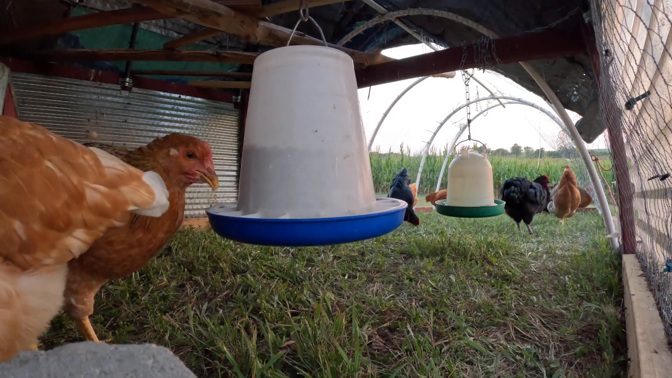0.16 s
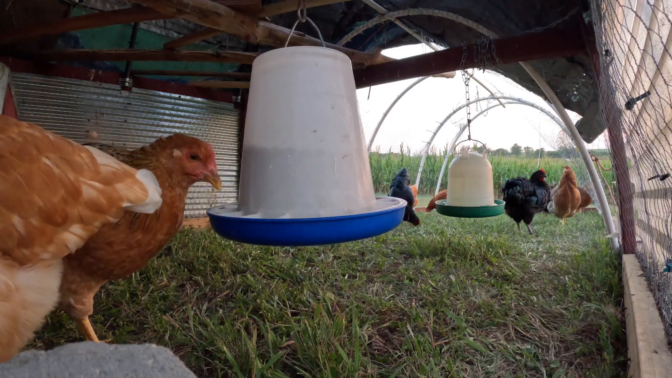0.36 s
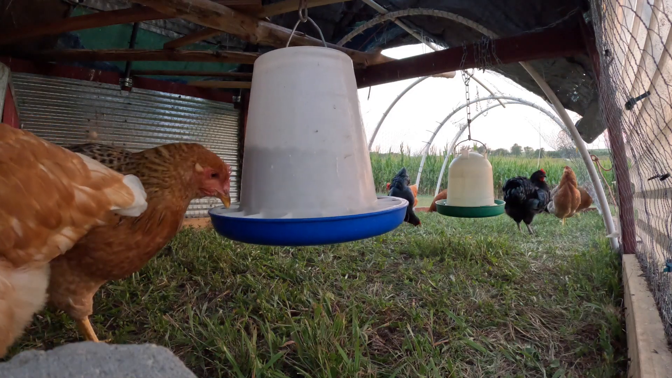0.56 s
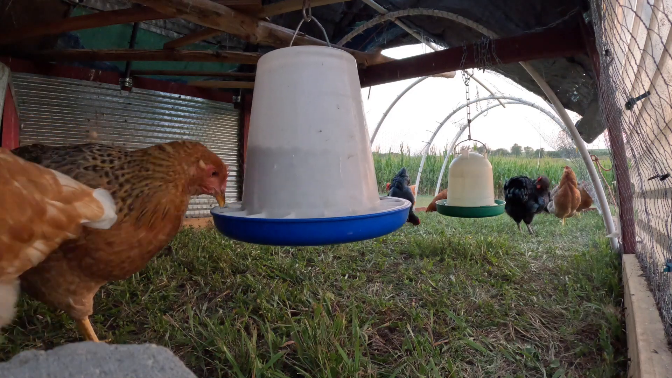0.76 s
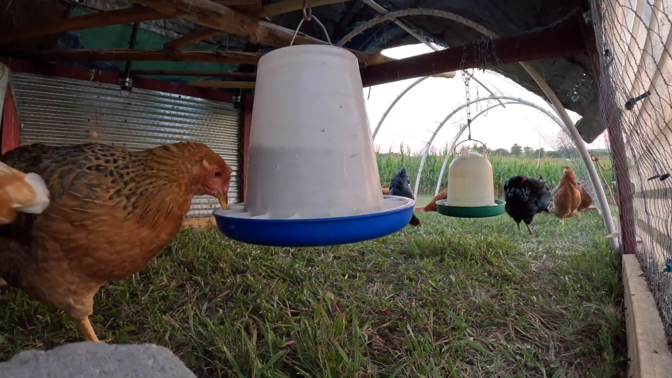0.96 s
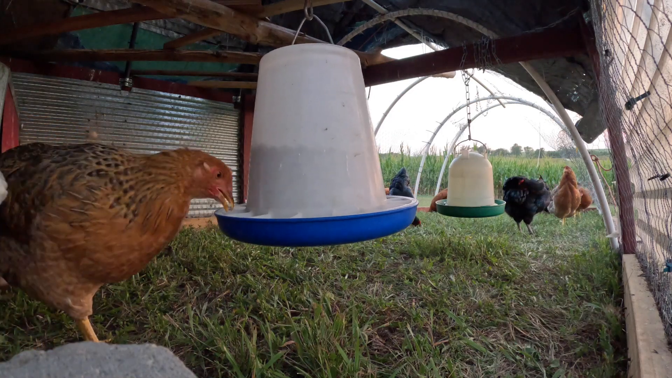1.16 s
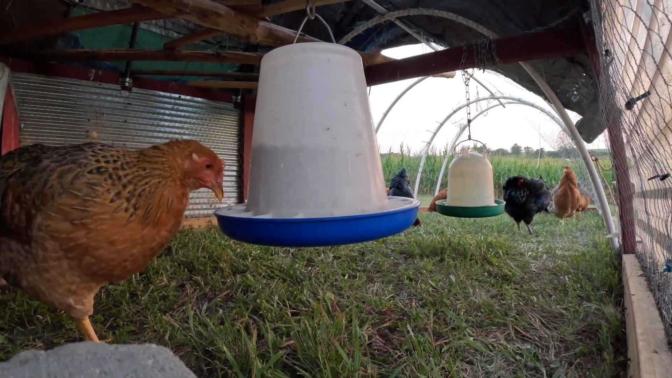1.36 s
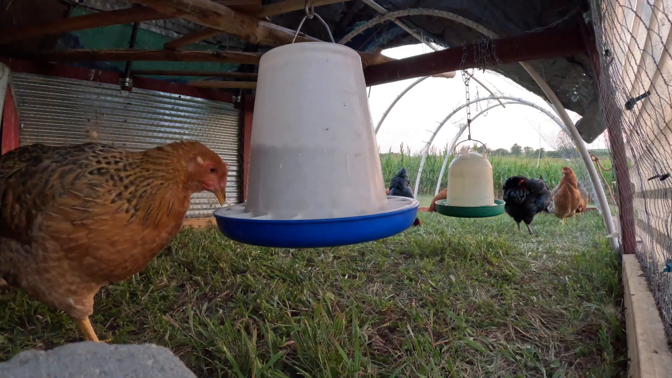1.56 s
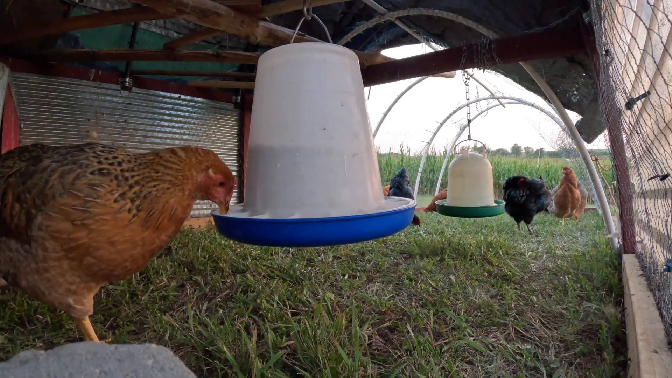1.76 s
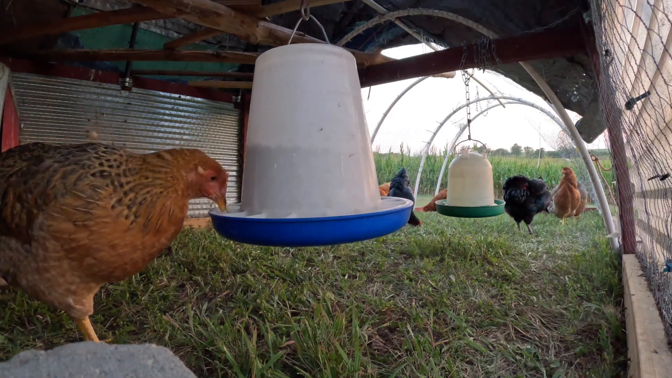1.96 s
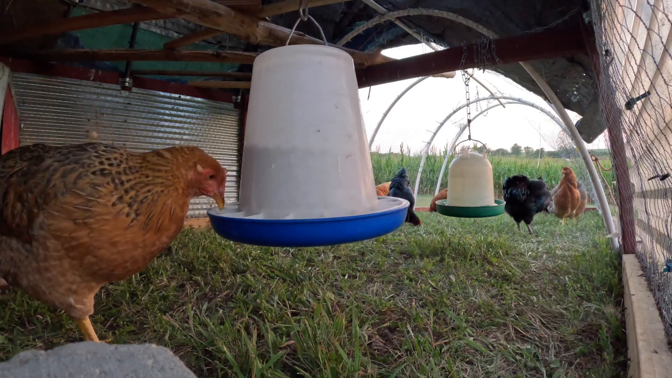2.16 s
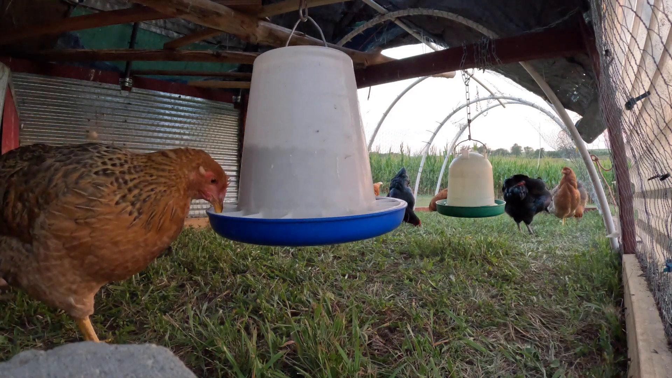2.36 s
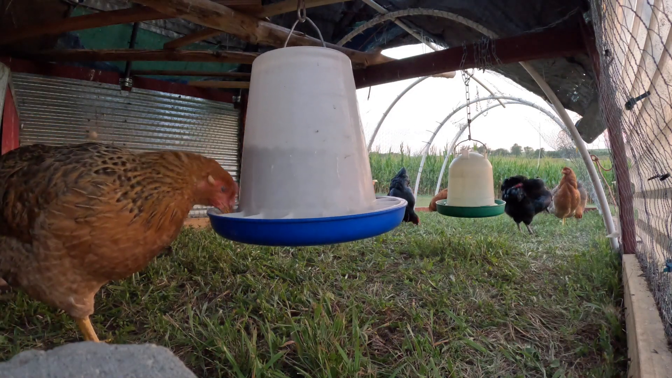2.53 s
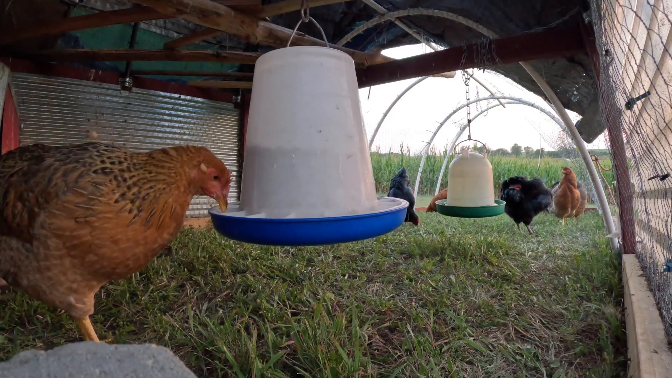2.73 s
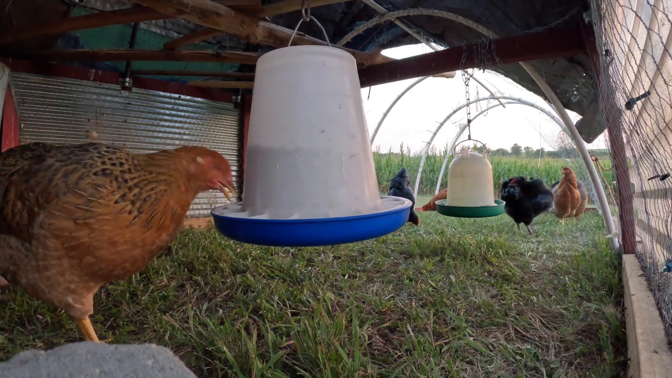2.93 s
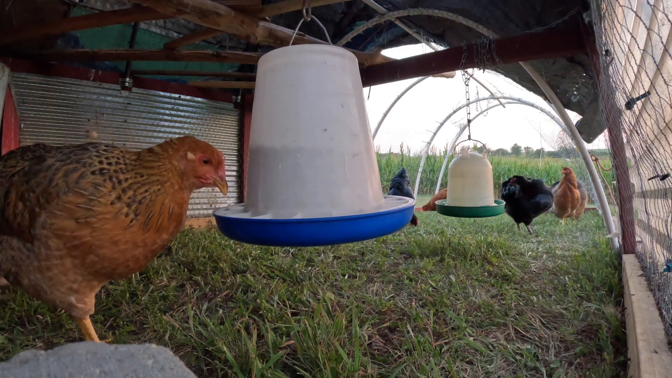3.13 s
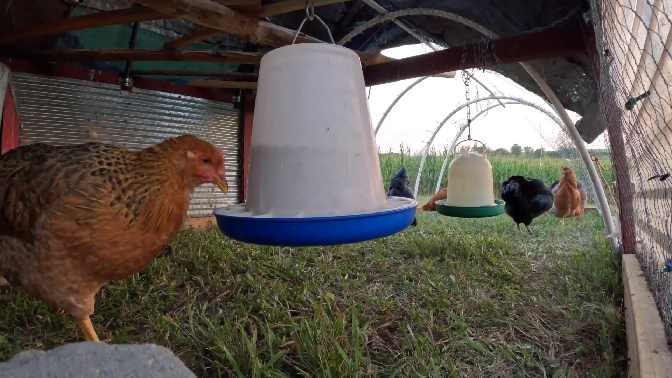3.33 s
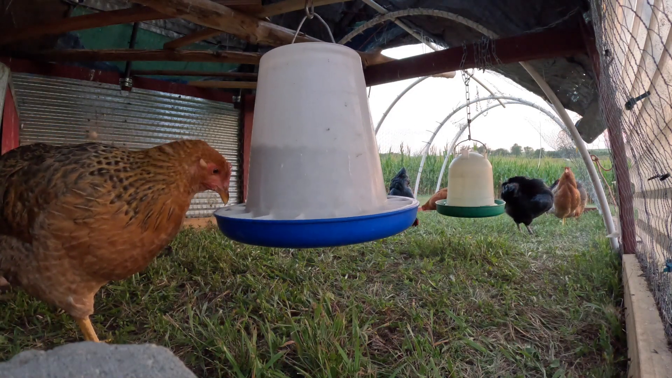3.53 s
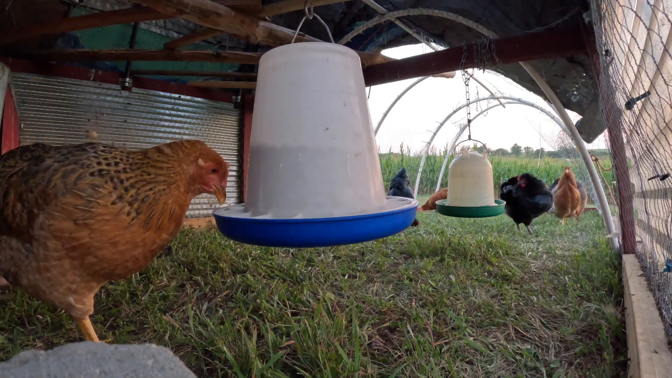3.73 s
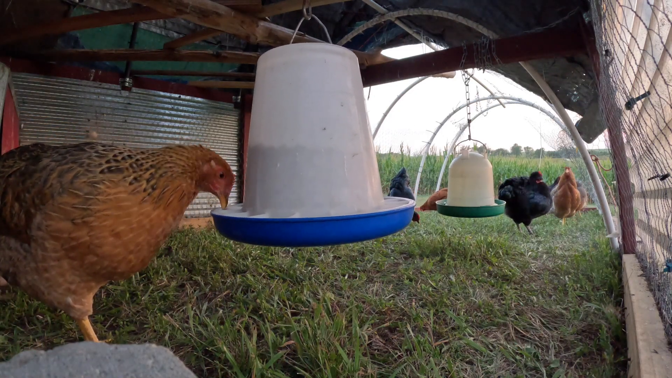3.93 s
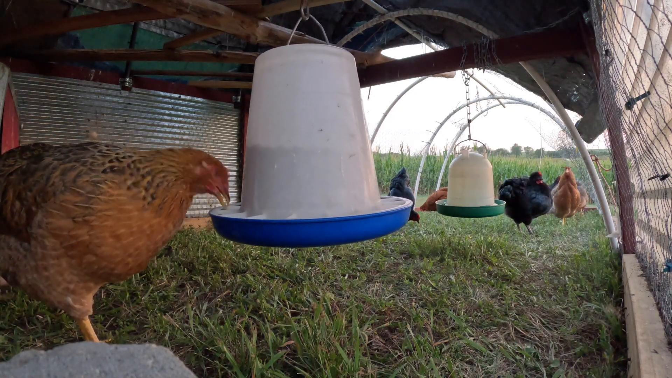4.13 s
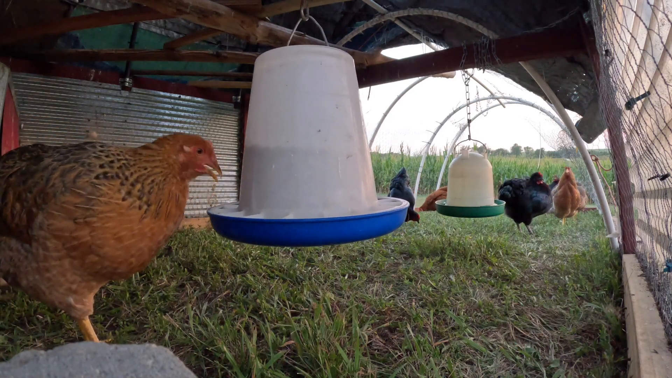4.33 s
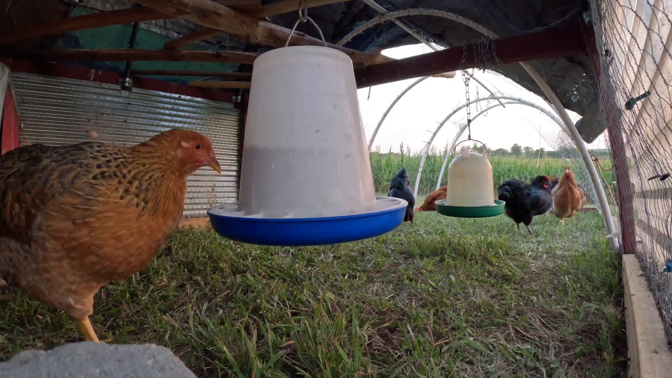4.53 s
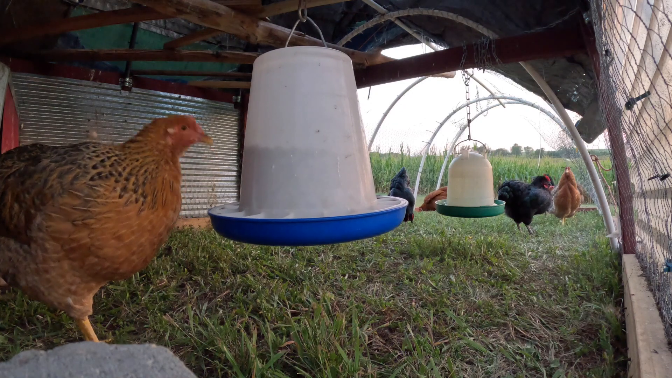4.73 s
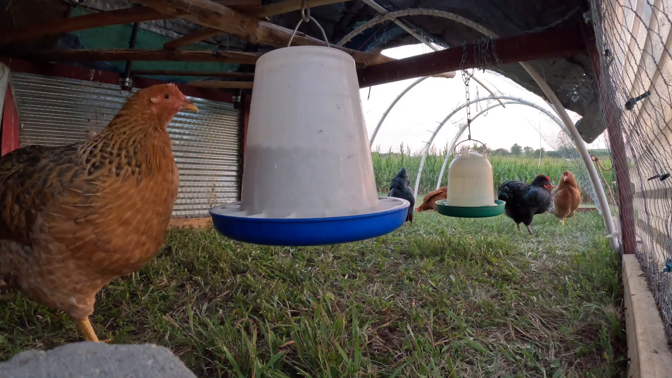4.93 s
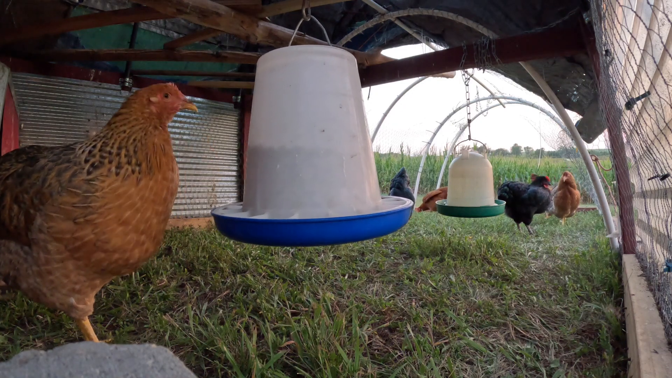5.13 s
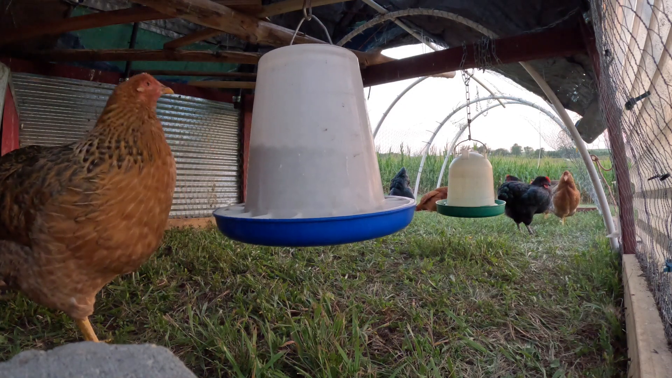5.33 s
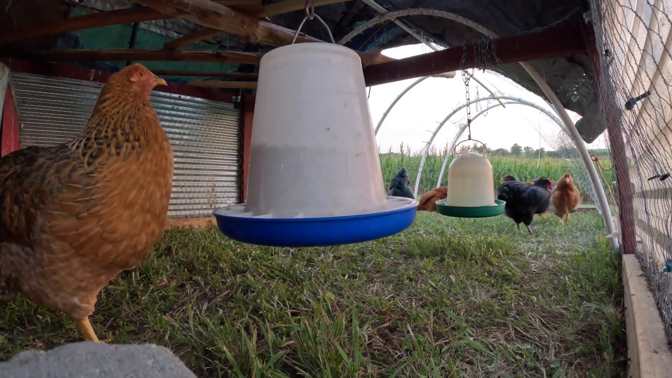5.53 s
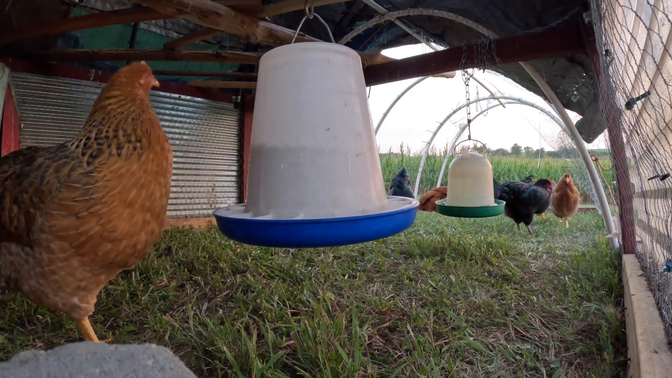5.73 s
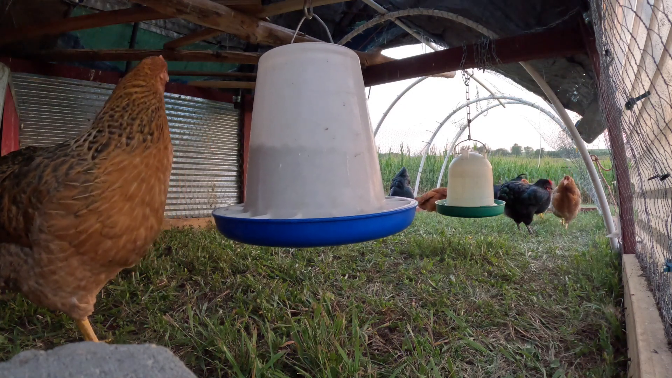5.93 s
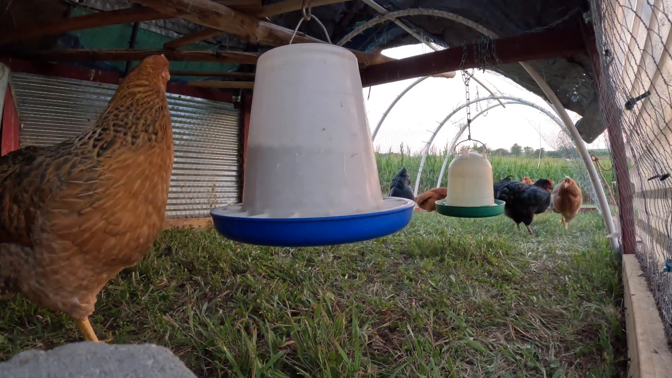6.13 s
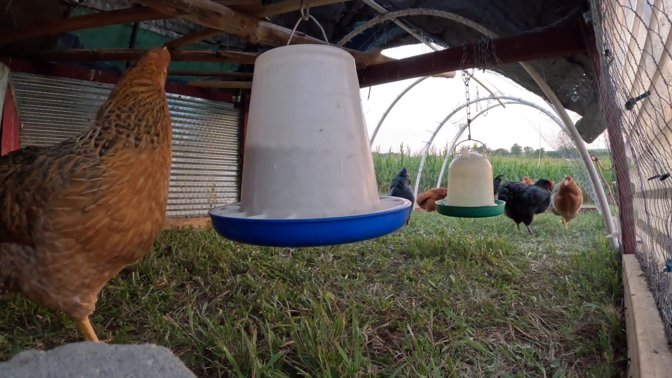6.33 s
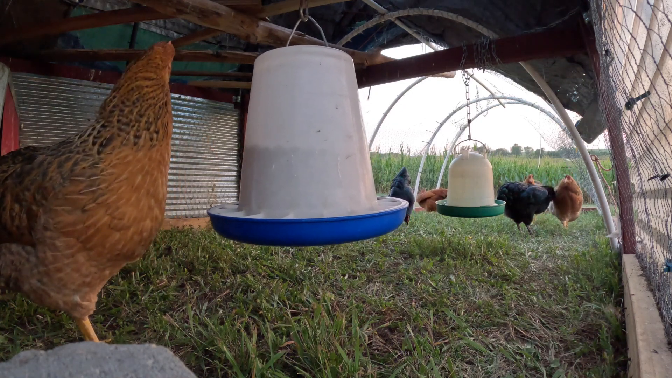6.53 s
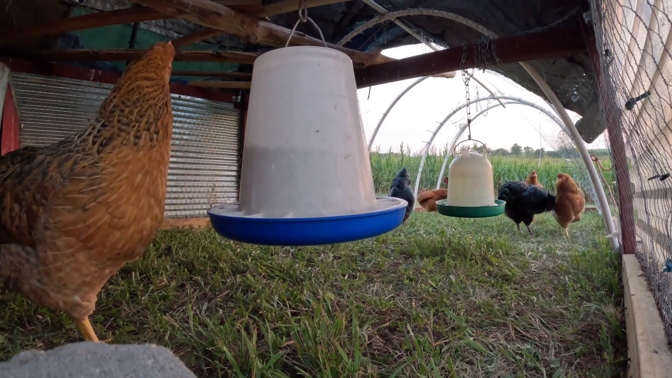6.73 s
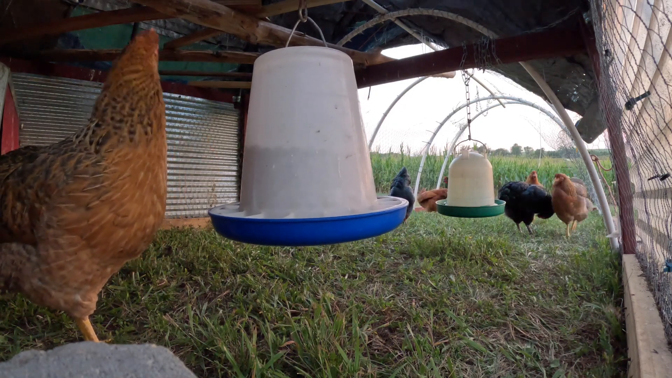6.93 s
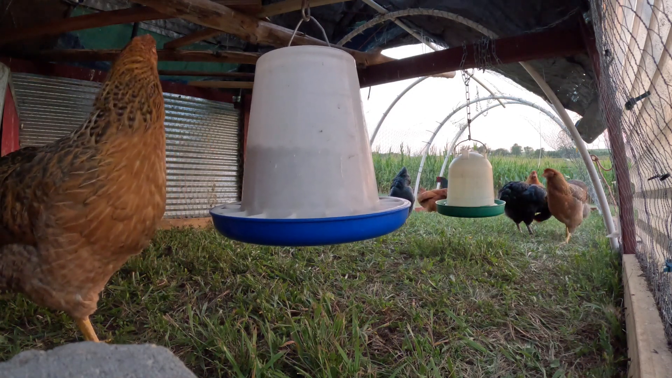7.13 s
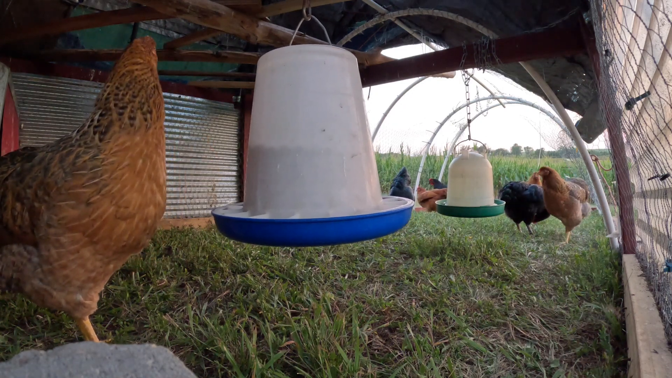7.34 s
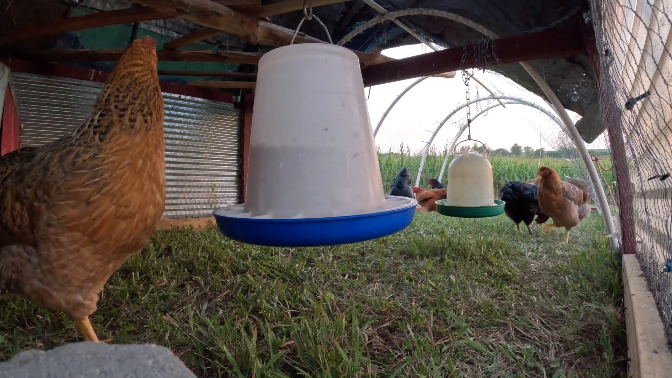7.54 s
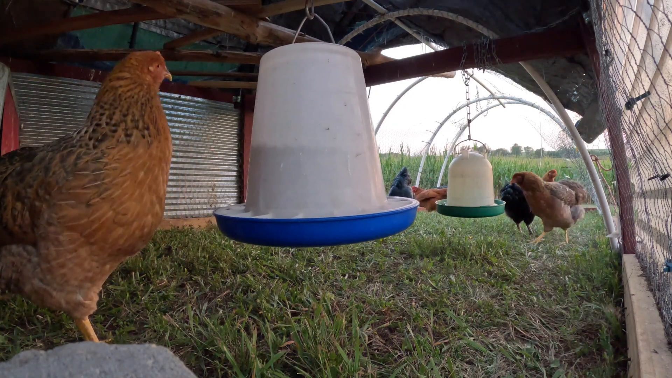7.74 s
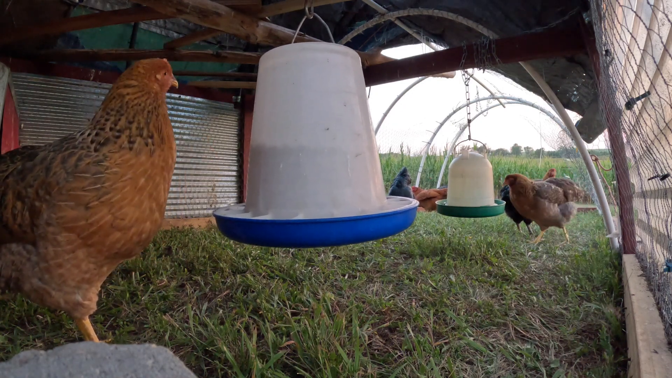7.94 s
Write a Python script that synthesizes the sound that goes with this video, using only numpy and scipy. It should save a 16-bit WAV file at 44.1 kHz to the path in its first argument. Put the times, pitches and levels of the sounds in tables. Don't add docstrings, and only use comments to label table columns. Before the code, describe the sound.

Close up in an outdoor run, a hen pecks a hanging plastic tray in short clusters: hard bright cracks, brief hollow ringing and crunching grain. The pecking thins and stops after about four seconds. Quiet insect chirring continues, then feathers rustle and hens give soft low clucks, dull bumps, a rough croak and thin squeals. Wide stereo microphone near the feeder, faint breeze and distant flock murmur.

```python
import sys
import numpy as np
from scipy import signal
from scipy.fft import rfft, irfft, next_fast_len
from scipy.io import wavfile
from scipy.ndimage import uniform_filter1d

SR = 44100
rng = np.random.default_rng(int(sys.argv[2]) if len(sys.argv) > 2 else 0)


def convert_level_to_amplitude(level_db):
    exponent = np.asarray(level_db, float) / 20
    return 10 ** exponent


def transcribe(signal):
    frames = np.atleast_2d(signal).T
    limited = np.clip(frames, -1, 1)
    pcm = np.round(limited * 32767).astype(np.int16)
    wavfile.write(sys.argv[1], SR, pcm)


N = 352359
PADDED = next_fast_len(N)


def evened(x):
    return x / np.sqrt(np.mean(x ** 2) + 1e-20)


def read(points, hz):
    f, value = np.transpose(points)
    return np.interp(np.log(hz + 1), np.log(f + 1), value)


def add(mix, s, sound):
    part = mix[round(s * SR):][:len(sound)]
    part += sound[:len(part)]


def columns(rows):
    s, *values = np.transpose(rows)
    t = np.arange(s[0], s[-1], 1 / SR)
    return [np.interp(t, s, v) for v in values]


def hump(start, swell, dying, from_db, top_db, to_db):
    top = start + swell
    return [(start, top_db + from_db), (top, top_db), (top + dying, top_db + to_db)]


def level(humps):
    out = np.zeros(N)
    for rows in humps:
        db, = columns(rows)
        add(out, rows[0][0], convert_level_to_amplitude(db) * signal.windows.tukey(len(db), .06))
    return out


def within(points, hz):
    return (hz > points[0][0]) & (hz < points[-1][0])


def coloured(x, points):
    hz = np.fft.rfftfreq(PADDED, 1 / SR)
    return evened(irfft(rfft(x, PADDED) * convert_level_to_amplitude(read(points, hz)) * within(points, hz), PADDED)[:N])


def wander(frames, top_hz):
    t = np.arange(frames) * 256 / SR
    rates = np.geomspace(top_hz / 12, top_hz, num=24)
    return evened(sum(np.sin(2 * np.pi * (f * t + rng.random())) / np.sqrt(f) for f in rates))


def resonate(x, hz, width_hz):
    return signal.lfilter(*signal.iirpeak(hz, hz / width_hz, SR), x)


# (frequency [Hz], level [dB])
WIND = [(15, -0.5), (45, 1.5), (75, -13.5), (110, -27.5)]
# (frequency [Hz], level [dB])
AIR = [(15, -14.5), (45, -15.5), (95, -32), (300, -19), (2400, -31.5), (11000, -47.5), (12600, -46.5),
       (15100, -56.5)]
# (frequency [Hz], level [dB])
MURMUR = [(100, -31), (140, -14), (185, 3), (230, -7.5), (290, -13.5), (420, -21.5), (500, -40.5)]
# (frequency [Hz], level [dB])
ROAD = [(800, -36), (1000, 1.5), (1100, 2), (1400, 0.5), (1900, -8.5), (2400, -25.5)]
# (frequency [Hz], level [dB])
CHORUS = [(2700, -22), (3500, -11.5), (4300, -7.5), (4750, -4.5), (5100, -6.5), (5400, -8), (6000, -11.5),
          (6500, -18.5)]
# (frequency [Hz], level [dB])
KATYDIDS = [(3710, -42), (6300, -14), (7170, -4), (7380, -2.5), (7740, -1.5), (8350, -16), (8500, -13.5),
            (11000, -38)]
# (time [s], carry [dB])
BREEZE = [(0, 10.5), (0.24, 2), (0.58, -10.5), (1.2, 0.5), (1.51, -3), (2.0, 3), (2.62, -3.5), (3.89, -1),
          (4.18, 4), (4.61, 1.5), (4.87, 2.5), (5.47, 1), (6.34, 9), (6.7, 3), (7.99, 1)]
# (time [s], level [dB])
CHORUS_FADE = [(0, -59.5), (2.619, -59.5), (4.3, -64.5), (5.47, -62.5), (7.99, -66)]
# (frequency [Hz], likeness [0-1])
LIKENESS = [(20, .86), (140, .68), (770, .3), (2700, .35), (4200, .62), (6400, .72), (9800, .8),
            (15000, .2)]
# (frequency [Hz], left minus right [dB])
LEAN = [(60, -2.5), (140, -2.5), (500, -10), (1200, -2.5), (2700, .5), (10000, 1.5), (12000, 23),
        (15000, 27.5)]


def background():
    frames, hz = N // 256 + 5, np.fft.rfftfreq(1024, 1 / SR)
    t = np.arange(frames) * 256 / SR
    carry_db = np.interp(t, *np.transpose(BREEZE))
    chorus_db = np.interp(t, *np.transpose(CHORUS_FADE))
    murmur_db = -63 + 0.27 * carry_db + .5 * t
    beat = np.sin(2 * np.pi * np.cumsum(16 + 2.2 * wander(frames, 3)) * 256 / SR)
    layers = [(WIND, -67.5 + 3 * wander(frames, 5.5)),
              (AIR, -66.5 + 0.48 * wander(frames, 4.2)),
              (MURMUR, murmur_db + 1.9 * wander(frames, 25)),
              (ROAD, -70 + carry_db + 0.408 * wander(frames, 1.8)),
              (CHORUS, chorus_db + 1.0 * wander(frames, 30)),
              (KATYDIDS, -65 + 2.0 * beat + 0.65 * wander(frames, 15))]
    power = 0
    for points, db in layers:
        shape = convert_level_to_amplitude(read(points, hz)) * within(points, hz)
        power = power + (shape[:, None] / np.linalg.norm(shape) * convert_level_to_amplitude(db)) ** 2
    top_band = (hz > 8300) & (hz < 11300)
    lull_db = 2.5 * np.outer(top_band, wander(frames, 12))
    power = power * convert_level_to_amplitude(2 * lull_db)

    a, b, c, d, patches = rng.standard_normal((frames, 513, 5)).T
    patches = uniform_filter1d(uniform_filter1d(patches, size=5, axis=0), size=10, axis=1)
    same = np.clip(read(LIKENESS, hz), 0, 1)[:, None]
    lean = convert_level_to_amplitude(read(LEAN, hz) / 2)[:, None]
    left = a + 1j * b
    right = same * left + np.sqrt(1 - same ** 2) * (c + 1j * d)
    field = np.array([left * lean, right / lean]) * np.sqrt(power) * convert_level_to_amplitude(0.93 * evened(patches))
    return 0.61 * signal.istft(field, nperseg=1024, noverlap=768)[1][:, :N]


# (frequency [Hz], level [dB], pulse rate [1/s])
SINGERS = [(4720, -72, 16), (4780, -78, 17), (4850, -77.5, 38), (5100, -73.5, 23), (4970, -83.5, 50),
           (5450, -79.5, 30), (7100, -87.5, 47.2), (7400, -80.5, 6.3), (7520, -77.5, 34), (7960, -77.5, 18)]
# (frequency [Hz], level at the start [dB], pulse rate [1/s])
SWARM = [(5520, -75, 21), (5700, -76, 29), (5790, -77, 17), (5840, -76, 35), (6110, -77.5, 25)]


def singers():
    out, frames = np.zeros((2, N)), N // 256 + 2
    fades = [0] * len(SINGERS) + [2.5] * len(SWARM)
    sides = rng.uniform(-2.2, 2, len(fades))
    for (hz, db, per_s), fade, side in zip(SINGERS + SWARM, fades, sides):
        waver, pace, swell = (np.repeat(wander(frames, top), 256)[:N] for top in (40, 4, 14))
        beat = np.sin(2 * np.pi * np.cumsum(per_s * (1 + .45 * pace)) / SR)
        pulses = np.clip(.5 + .7 * beat, 0, 1)
        tone = np.sin(2 * np.pi * np.cumsum(hz * (1 + .004 * waver)) / SR)
        course_db = db - fade * np.arange(N) / SR + 2.78 * uniform_filter1d(swell, size=256)
        out += convert_level_to_amplitude(course_db + np.array([[side], [-side]])) * pulses * tone
    return out


# (start [s], end [s], frequency [Hz], level [dB])
TRILLS = [
    (.15, 0.33, 4050, -74),
    (1.46, 1.69, 4070, -67.5),
    (4.256, 4.404, 4090, -69.5),
]


def cricket():
    out = np.zeros(N)
    for start, end, hz, db in TRILLS:
        t = np.arange(0, end - start, 1 / SR)
        noises = rng.standard_normal((2, len(t)))
        waver, swell = (evened(np.convolve(v, np.hanning(900), "same")) for v in noises)
        line = np.sin(2 * np.pi * hz * t + .8 * waver)
        add(out, start, convert_level_to_amplitude(db - 2 + 2.5 * swell) * line * signal.windows.tukey(len(t), .5))
    return out


# (loudest moment [s], swell [s], dying [s], top level [dB])
RUSTLES = [(.45, 0.12, 0.093, -88.5), (.866, 0.071, 0.074, -83.5), (1.85, 0.13, 0.17, -85.5),
           (5.386, 0.033, .05, -88), (5.712, 0.075, 0.043, -74.5), (6.238, 0.036, 0.013, -84),
           (6.57, 0.023, 0.037, -87), (6.664, 0.009, 0.021, -75.5), (6.81, 0.055, 0.043, -82.5),
           (7.11, 0.016, 0.039, -82)]
# (frequency [Hz], level [dB])
RUSTLE = [(470, 0), (800, -9), (1400, 0), (2270, -11.5), (3090, -4), (3680, -9), (4650, -5.5), (7550, 1.5),
          (15500, -27)]


def rustle():
    gain = level([hump(s - a, a, b, -12.5, db, -12.5) for s, a, b, db in RUSTLES])
    return convert_level_to_amplitude(15.0) * gain * coloured(rng.standard_normal(N), RUSTLE)


def knocks(rows):
    out, t = np.zeros(N), np.arange(-200, 200) / SR
    for s, db, hz, half in rows:
        add(out, s + t[0], -convert_level_to_amplitude(db) * np.cos(2 * np.pi * hz * t) * np.exp(-.5 * (t / half) ** 2))
    return out


# (time [s], peak [dB], frequency [Hz], half length [s])
FAR_KNOCKS = [(3.1305, -60, 1390, .0012), (4.3545, -42.5, 1600, 0.00052), (6.9553, -38, 1286, 0.00025),
              (6.9592, -47, 1190, .0007), (7.051, -51.5, 1400, .0004), (7.2068, -37, 948, 0.0003),
              (7.2108, -44.5, 1100, 0.0009), (7.2137, -55, 1100, 0.00062), (7.4226, -36, 1070, 0.00044),
              (7.433, -50, 1195, 0.00089)]


def far_knocks():
    return knocks(FAR_KNOCKS)


# (time [s], peak [dB], frequency
# [Hz], width [Hz], length [s])
BURSTS = [(0.114, -43.5, 744, 301, 0.032), (2.918, -55.5, 642, 302, 0.034), (1.141, -56, 650, 300, 0.022),
          (6.513, -64, 2570, 1200, 0.03), (2.593, -52, 690, 297, .04), (4.862, -54, 190.7, 59.5, 0.14),
          (6.513, -53, 720, 59.5, 0.041), (6.514, -58, 1443, 2420, 0.11), (6.894, -56.5, 720, 60, 0.06),
          (6.902, -61.5, 1490, 1600, 0.034), (6.955, -48.5, 1200, 506, 0.027),
          (7.211, -47.5, 990, 900, 0.02), (7.423, -50, 1102, 914, 0.026), (7.492, -55, 297, 200, 0.014),
          (7.71, -58.5, 271, 119, 0.083)]


def bursts():
    out = np.zeros(N)
    for s, db, hz, width_hz, length in BURSTS:
        t = np.arange(0, length, 1 / SR)
        r = np.exp(-np.pi * width_hz / SR)
        noise = rng.standard_normal((2, len(t) + 800))
        slow = signal.lfilter([1], np.poly([r, r, r]), noise)[:, 800:]
        note = slow[0] * np.cos(2 * np.pi * hz * t) + slow[1] * np.sin(2 * np.pi * hz * t)
        fade = (1 - np.exp(-20 * t / length)) * (1 - t / length)
        add(out, s, convert_level_to_amplitude(db - 14 * t / length) * evened(note) * fade)
    return out


# (frequency [Hz], width [Hz], level [dB])
THROAT = [(560, 260, -11), (960, 620, 5), (1430, 750, -1), (2050, 320, -2.5), (3400, 970, -10)]


def voice(rows, rough, throat_db, chest_db):
    db, hz, loss_db = columns(rows)
    jitter, breath = rng.standard_normal((2, len(hz)))
    unsteady = 0.064 * rough * evened(uniform_filter1d(jitter, size=200))
    turns = np.cumsum(hz * (1 + unsteady)) / SR
    pulse_strengths = convert_level_to_amplitude(1.6 * rng.standard_normal(100))
    strength = uniform_filter1d(pulse_strengths[turns.astype(int)], size=60)
    hum = sum(convert_level_to_amplitude(-(loss_db + chest_db) * k) * np.cos(2 * np.pi * (k + 1) * turns + 1.24 * k)
              for k in range(6))

    puffs = rough * breath * np.exp(-(turns % 1))
    pulses = evened(np.diff(turns // 1, prepend=0)) + puffs
    ring = 0
    for k, (f, width, gain_db) in enumerate(THROAT[:-1]):
        ring = ring + (-1) ** k * convert_level_to_amplitude(gain_db) * resonate(resonate(pulses, f, 2 * width), f, width)
    f, width, gain_db = THROAT[-1]
    hiss = resonate(resonate(breath, f, width), f, width)
    ring = signal.sosfilt(signal.butter(8, 2180, fs=SR, output="sos"), ring)
    ring = ring + convert_level_to_amplitude(gain_db) * rough * hiss
    blend = evened(hum) + convert_level_to_amplitude(throat_db - loss_db) * evened(ring)
    return convert_level_to_amplitude(db) * strength * blend * signal.windows.tukey(len(hz), .1)


def soft(start, length, db, hz, loss_db):
    effort = hump(start, 0.25 * length, 0.42 * length, -9.5, db, -3)
    effort.append((start + length, db - 14.5))
    lateness = (0, 0.19, 0.52, 0.87)
    return [(*row, hz * (1 - 0.041 * late), loss_db + 4.5 * late ** 2)
            for row, late in zip(effort, lateness)]


# (start [s], length [s], level [dB], pitch [Hz], loss per overtone [dB])
CLUCKS = [
    (6.512, 0.018, -54.5, 306, 19),
    (6.543, 0.048, -54, 286, 19),
    (6.735, 0.073, -49.5, 300, 5.5),
    (6.892, 0.032, -53, 300, 11.5),
    (7.058, 0.066, -56.5, 289.5, 20.5),
]


def clucks():
    out = np.zeros(N)
    for row in CLUCKS:
        add(out, row[0], voice(soft(*row), rough=.4, throat_db=-12, chest_db=0))
    return out


# (time [s], level [dB], pitch [Hz], loss per overtone [dB])
CROAK = [
    (7.515, -67, 203.2, 34),
    (7.533, -54, 193.5, 30.5),
    (7.536, -55, 195.8, -4.5),
    (7.557, -41, 170.9, 6),
    (7.594, -48.5, 156, -1.5),
    (7.606, -51.5, 159, 9),
    (7.634, -79, 151.5, 21),
]


def croak():
    out = np.zeros(N)
    add(out, CROAK[0][0], voice(CROAK, rough=0.54, throat_db=3.0, chest_db=4))
    return out


def squeal(rows):
    hz, db, squeeze_db = columns(rows)
    turns = np.cumsum(hz) / SR
    noise = rng.standard_normal(len(hz))
    flutter = 1 + .06 * evened(np.convolve(noise, np.hanning(300), "same"))
    second_db = db + squeeze_db
    partials_db = db, second_db, second_db - 18, second_db - 36
    whistle = sum(convert_level_to_amplitude(p) * np.sin(2 * np.pi * (k + 1) * turns) for k, p in enumerate(partials_db))
    return 1.7 * flutter * whistle


# (time [s], pitch [Hz], level [dB], squeeze: second partial over the whistle [dB])
SQUEALS = [
    [(7.237, 1650, -71, -45), (7.2395, 1630, -52, -44), (7.249, 1540, -52.5, -40), (7.257, 1210, -40, -37),
     (7.27, 990, -49, -19), (7.283, 876, -57, -31), (7.295, 870, -80, -29)],
    [(7.852, 742, -80, -21), (7.87, 630, -49, -2), (7.886, 635, -67, -15), (7.9, 674, -48, -7),
     (7.908, 570, -45.5, 8.5), (7.922, 500, -46.5, 8.5), (7.932, 585, -58, 13), (7.95, 560, -59, -12)],
    [(7.926, 583, -59, -2), (7.934, 653, -42.5, -11), (7.945, 697, -47, -12), (7.949, 960, -42, -30),
     (7.955, 1018, -35, -28), (7.963, 1276, -40.5, -34), (7.978, 1023, -45, -30), (7.99, 1202, -41, -30)],
]
WALL_DB = [
    -8,
    -19,
    -17,
]


def squeals():
    out = np.zeros(N)
    for rows, echo_db in zip(SQUEALS, WALL_DB):
        whistle = squeal(rows)
        add(out, rows[0][0], whistle)
        add(out, rows[0][0] + .0065, convert_level_to_amplitude(echo_db) * whistle)
    return out


def hens():
    out = far_knocks() + clucks() + croak() + bursts() + squeals()
    return signal.sosfilt(signal.butter(3, [110, 3800], "band", fs=SR, output="sos"), out)


# (start [s], swell [s], dying [s], top level [dB], treble above it [dB])
CRUNCH = [(.009, 0.014, 0.035, -41.5, -10), (0.077, 0.0018, 0.045, -34.5, -10),
          (0.111, 0.0068, 0.055, -40, -3), (.22, 0.014, 0.069, -57.5, -5), (1.144, 0.014, 0.062, -48, -6),
          (1.251, 0.02, 0.021, -54.5, -6), (1.933, 0.024, 0.064, -48, -7), (2.587, 0.021, 0.051, -43.5, -5),
          (2.908, 0.0097, 0.065, -45.5, -4), (2.987, 0.0069, 0.034, -38.5, -5),
          (3.039, .003, 0.056, -58, 2), (3.065, 0.013, 0.093, -54, -5), (4.147, 0.01, 0.065, -48.5, -6),
          (4.251, 0.0013, 0.07, -52.5, -0.5)]
# (frequency [Hz], level [dB])
TRAY = [(400, -25), (727, -18), (900, -18), (1350, -6.5), (2260, -11.5), (2900, -19.5), (3770, -32),
        (6380, -120)]
# (frequency [Hz], level [dB])
GRIT = [(1530, -39), (2780, -7.5), (3330, 2), (4730, -2), (5530, -0.5), (7800, -3.5), (9500, -14.5),
        (15300, -37.5)]


def crunch():
    sizes = convert_level_to_amplitude(3 * np.minimum(rng.exponential(1, (2, N)), 2.5))
    struck = rng.random((2, N)) < [[1800 / SR], [3000 / SR]]
    grains = rng.choice([-1., 1.], (2, N)) * sizes * struck
    body = level([hump(s, a, b, -7, db, -30.5) for s, a, b, db, _ in CRUNCH])
    grit = level([hump(s, a, b, -5.5, db + up_db, -30.5) for s, a, b, db, up_db in CRUNCH])
    s, _, hz, _ = np.transpose(BLOWS)
    last_blow = np.maximum(np.searchsorted(s, np.arange(N) / SR) - 1, 0)
    turn = np.exp(2j * np.pi * np.cumsum(hz[last_blow]) / SR)
    r = np.exp(-np.pi * 1500 / SR)
    spot = evened((turn * signal.lfilter([1], np.poly([r, r]), grains[0] / turn)).real)
    knocked = convert_level_to_amplitude(-3.5) * coloured(grains[0], TRAY) + convert_level_to_amplitude(-14) * spot
    return body * knocked + grit * coloured(grains[1], GRIT)


# (time [s], peak [dB], frequency [Hz], t60
# [s])
THUDS = [
    (0.019, -21.5, 260, 0.02),
    (0.075, -39.5, 242, 0.092),
    (0.109, -21, 340, 0.038),
    (1.15, -40, 367, 0.03),
    (2.919, -52, 151, 0.073),
    (6.952, -35, 261, 0.044),
    (7.208, -39.5, 175, 0.033),
    (7.42, -41.5, 167, 0.055),
]


def thuds():
    out, t = np.zeros(N), np.arange(6000) / SR
    for s, db, hz, t60 in THUDS:
        swing = np.sin(2 * np.pi * hz * t) + 0.38 * np.sin(2 * np.pi * .68 * hz * t)
        add(out, s + 0.0015, convert_level_to_amplitude(db - 4.0 - 60 * t / t60) * swing * (1 - np.exp(-t / 0.0024)))
    return out


# (time [s], peak [dB], frequency [Hz], half
# length [s])
SNAPS = [(.0198, -32.5, 3700, 0.00035), (.0779, -17.5, 3460, 0.00027), (.079, -28, 2100, .0006),
         (.0777, -27.5, 7000, .0003), (.1099, -15.5, 4500, 0.00026), (.1101, -26.5, 7200, .0003),
         (.1234, -30, 1740, .0006), (1.1512, -26.5, 3840, 0.00013), (1.1514, -40, 5100, .0003),
         (1.161, -42, 4600, .0003), (1.2605, -47, 5500, .0003), (1.4327, -62, 3400, 0.00066),
         (1.9365, -48, 3600, 0.0011), (1.939, -50, 3400, 0.0007), (1.9545, -54, 3300, 0.00065),
         (2.5905, -39.5, 3600, .0006), (2.6062, -39.5, 3530, .0008), (2.6215, -44, 3200, .001),
         (2.622, -45, 8000, 0.00054), (2.9245, -43, 2810, 0.0009), (2.9859, -10.5, 4030, 0.00015),
         (2.986, -24.5, 6300, 0.00021), (2.9858, -28, 8000, 0.00023), (2.9945, -37.5, 2280, 0.0019),
         (2.9985, -32, 2300, .0012), (2.999, -40, 4700, .0006), (3.0366, -32, 3330, 0.00032),
         (4.1562, -48, 3400, .0008), (4.161, -46, 3400, 0.00076), (4.2535, -48, 1200, 0.0018),
         (4.2585, -47, 1240, 0.0018), (4.268, -56, 1210, .005)]


def snaps():
    return knocks(SNAPS)


# (time [s], peak [dB], tray ring [Hz], crack above the ring [dB])
BLOWS = [(0.0185, -23.5, 1685, -22.5), (0.0272, -31, 2036, -16), (0.0773, -15.5, 1560, -13),
         (0.0866, -37, 1603, -12.5), (0.088, -29, 1560, -19), (0.10965, -10, 1723, -11),
         (0.11075, -12, 1710, -30), (0.11175, -25, 1740, -29.5), (0.116, -32, 1894, -17.5),
         (0.118, -28.5, 1656, -14.5), (0.1227, -24, 1850, -20.5), (1.151, -26, 1300, -16),
         (1.1653, -29, 1620, -29), (1.2502, -30.5, 1678, -26), (1.2608, -30.5, 1580, -20),
         (1.9532, -28.5, 1380, -24), (1.9676, -31, 1805, -16), (2.587, -33, 1837, -15.5),
         (2.5926, -41, 1755, -20), (2.6, -32, 1663, -13.5), (2.6021, -33, 1702, -13),
         (2.6073, -39.5, 1623, -19), (2.617, -47, 1763, -15), (2.9107, -31, 1825, -28.5),
         (2.9174, -31, 1770, -13.5), (2.92, -35.5, 1695, -10.5), (2.9857, -12.5, 2310, -12.5),
         (2.9872, -19.5, 2379, -24), (2.9927, -32, 2400, -16.5), (2.9972, -32, 2400, -12),
         (3.0328, -32, 2140, -12.5), (3.0366, -26, 2028, -9), (3.0623, -29.5, 1749, -22),
         (3.065, -36, 1628, -33), (3.0715, -33, 1580, -12), (3.0732, -30.5, 1553, -12),
         (3.085, -31, 1480, -18), (4.1557, -38, 1670, -12.5), (4.16, -37, 1711, -13),
         (4.2523, -33.5, 1616, -17), (4.2582, -32, 1726, -16)]
# (time [s], peak [dB], tray ring [Hz], crack above the ring [dB])
PICKS = [(0.0096, -38, 1600, -9), (0.015, -43, 1670, -22), (0.031, -37, 1460, -17.5),
         (0.036, -40, 1500, -19), (0.222, -50, 2120, -19), (1.1461, -36.5, 2050, -10),
         (1.1606, -40, 2100, -17), (1.23, -49, 2080, -9), (1.4327, -64.5, 1214, 9.5),
         (1.934, -45, 1900, -8), (1.9381, -38.5, 1890, -6.5), (1.947, -44, 1550, -21),
         (2.26, -55.5, 1490, -0.5), (2.6192, -36.5, 2130, -5), (2.6258, -40.5, 1340, -18),
         (2.9603, -43, 1600, -23), (3.042, -40, 1890, -15.5), (3.0459, -41, 2010, -11),
         (3.095, -36, 1370, -28), (4.15, -39, 1660, -20), (4.172, -43, 1600, -24), (4.1744, -49, 1480, -21),
         (4.1972, -47, 2010, -11), (4.2646, -50, 1430, -25), (5.438, -45, 1370, -26)]
# (frequency [Hz], level [dB])
CRACK = [(2900, -4.5), (4300, -5.5), (5900, -9), (7600, -6), (10500, -31), (14500, -35)]


def taps():
    out, t = np.zeros(N), np.arange(2000) / SR
    rows = BLOWS + PICKS
    rise = 1 - np.exp(-t / .00022)
    for (s, db, hz, crack_db), chance in zip(rows, rng.uniform(0.894, 1.1, (len(rows), 10))):
        t60 = 0.0076 / convert_level_to_amplitude(0.11 * (db + 38))
        bent = 0.88 * t + 0.00031 * (1 - np.exp(-t / 0.0019))
        ring = np.sin(2 * np.pi * hz * bent) * convert_level_to_amplitude(-60 * (t / t60) ** 1.285)
        modes_hz = np.geomspace(CRACK[0][0], CRACK[-1][0], num=10) * chance
        modes = np.sin(2 * np.pi * (modes_hz[:, None] * t + 5 * chance[::-1, None]))
        crack = (convert_level_to_amplitude(read(CRACK, modes_hz)) * chance) @ modes
        crack_gain = convert_level_to_amplitude(crack_db + 14 - 60 * t / .0034)
        add(out, s, convert_level_to_amplitude(db) * rise * (.9 * ring + crack_gain * crack))
    return signal.sosfilt(signal.butter(4, 850, "high", fs=SR, output="sos"), out)


def shelter(x, t60):
    t = np.arange(6000) / SR
    bounces = rng.choice([-1., 1.], (2, 6000)) * (rng.random((2, 6000)) < .05)
    tail = bounces * convert_level_to_amplitude(-60 * t / t60) * (t > .003)
    tail = signal.lfilter([1], [1, -.6], tail)
    return signal.oaconvolve(x[None], tail / np.linalg.norm(tail[0]), axes=1)[:, :N]


def placed(x, lean_db):
    dull = signal.oaconvolve(x, signal.firwin(31, 12000, fs=SR), "same")
    return np.array([x * convert_level_to_amplitude(lean_db / 2), dull / convert_level_to_amplitude(lean_db / 2)])


def scene():
    tray = taps() + thuds() + snaps() + crunch()
    voices = hens()
    near = placed(tray, 1.2) + placed(voices, .8) + placed(rustle(), 7.6) + placed(cricket(), 0.35)
    scatter = convert_level_to_amplitude(-16.5) * shelter(tray, 0.044) + .15 * shelter(voices, 0.1)
    return near + scatter + singers() + background()


def roll_off(x):
    return signal.sosfilt(signal.butter(12, 15760, fs=SR, output="sos"), x)


# (frequency [Hz], lag [radians])
PORT_LAG = [(300, 0), (1000, .42), (2600, .72), (4500, .45), (6500, .3), (12000, .2)]


def record(dry):
    lag = read(PORT_LAG, np.fft.rfftfreq(PADDED, 1 / SR))
    left = irfft(rfft(dry[0], PADDED) * np.exp(-1j * lag), PADDED)[:N]
    mix = np.array([left, dry[1]])
    return roll_off(mix)


dry = scene()
out = record(dry)
transcribe(out)
```